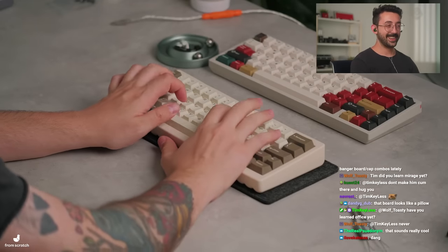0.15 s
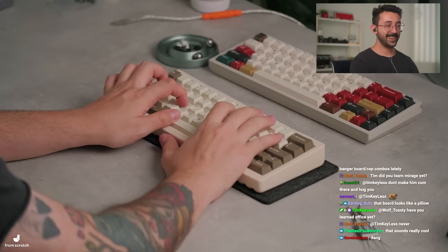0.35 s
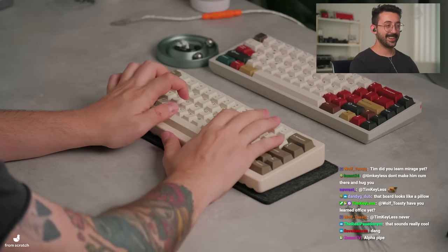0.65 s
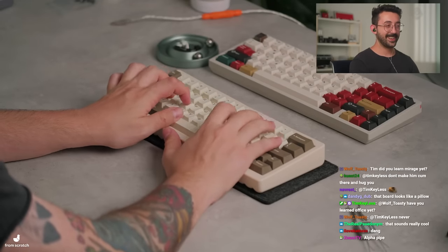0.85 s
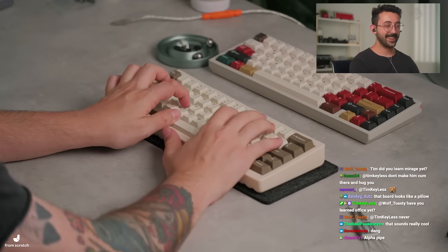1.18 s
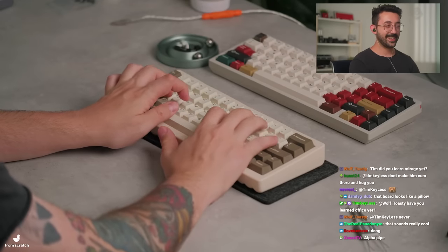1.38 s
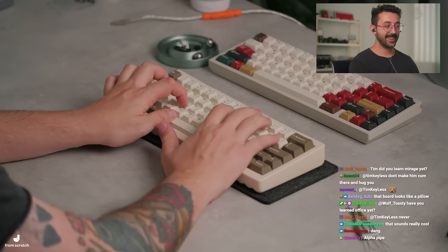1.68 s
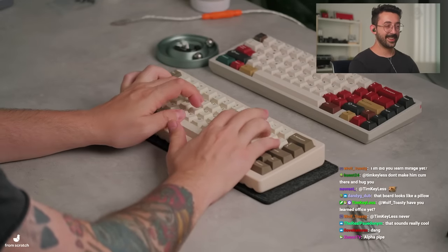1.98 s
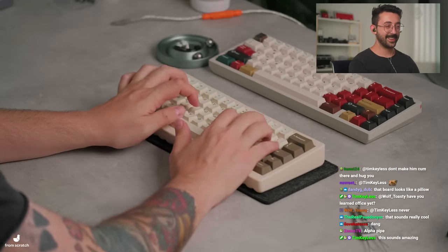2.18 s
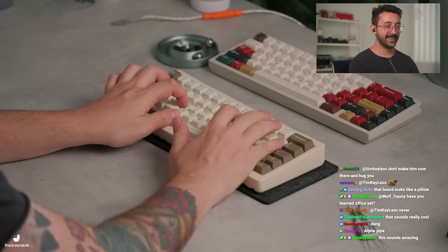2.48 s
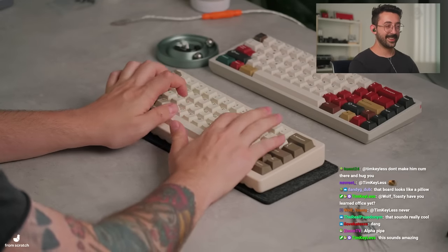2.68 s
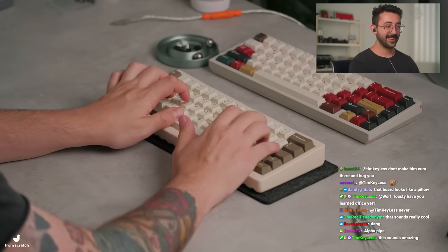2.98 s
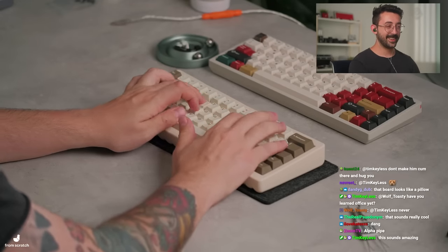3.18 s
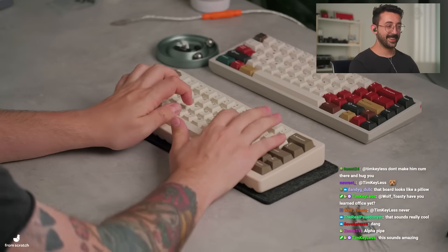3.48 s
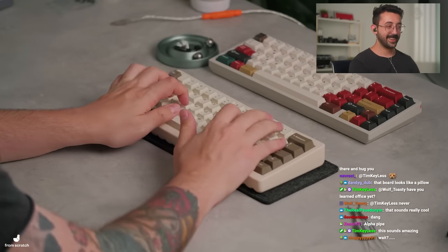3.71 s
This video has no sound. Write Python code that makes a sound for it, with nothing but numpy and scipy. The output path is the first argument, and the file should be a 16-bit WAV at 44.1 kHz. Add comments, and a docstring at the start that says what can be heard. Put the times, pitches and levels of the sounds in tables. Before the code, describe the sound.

Mechanical keyboard typed rapidly without a real pause, dry plastic clicks over faint room rumble and hiss.

```python
"""In a small room, fast typing on a mechanical keyboard that lies on a desk, heard from close by. Each press
and release knocks a plastic keycap, a sum of damped modes that ring for milliseconds, and rattles its switch.
The space bar has lower, hollower modes and its stabiliser rattles; fingertips touch caps with faint ticks.
Knocks also excite low desk modes. Desk reflections, a flutter echo and a short diffuse tail follow each click,
over a quiet rumble and hiss of shaped noise."""
import sys
import numpy as np
from scipy import signal
from scipy.fft import rfft, irfft
from scipy.io import wavfile

SR = 44100
rng = np.random.default_rng(int(sys.argv[2]) if len(sys.argv) > 2 else 0)


def inscribe(sig):
    """Save sig as 16-bit PCM at rate SR to the path in sys.argv[1].

    A 1-D sig is mono; a 2-D sig holds one channel per row.
    Samples are clipped to [-1, 1] before scaling.
    """
    pcm = np.round(np.clip(np.atleast_2d(sig).T, -1, 1) * 32767)
    wavfile.write(sys.argv[1], SR, pcm.astype(np.int16))


N = 169785   # length [samples]


def from_db(db):
    """Logarithmic level: 20 dB is a factor of ten in amplitude."""
    return 10 ** (np.asarray(db) / 20)


def at_hz(hz, points_hz, values):
    """Logarithmic frequency scale: a curve is interpolated evenly per octave."""
    return np.interp(np.log(np.maximum(hz, 1)), np.log(points_hz), values)


def add(track, time_s, sound):
    """Superposition: a sound adds to the track from its start time."""
    start = max(int(round(time_s * SR)), 0)
    track[start:start + len(sound)] += sound[:max(N - start, 0)]


def decay(t, t60):
    """Exponential damping: the amplitude falls by 60 dB in t60 seconds."""
    return np.exp(-np.log(1000) * t / t60)


def high_pass(x, hz):
    """Radiation efficiency: small parts radiate little bass."""
    return signal.sosfilt(signal.butter(2, hz, "high", fs=SR, output="sos"), x)


def coloured_noise(spectrum, size):
    """Spectral shaping: white noise is weighted by frequency and scaled to an rms of 1."""
    white = rfft(rng.standard_normal(size))
    gain = from_db(at_hz(np.fft.rfftfreq(size, 1 / SR), *np.transpose(spectrum)))
    noise = irfft(white * gain, size)
    return noise / noise.std()


def ring(hz, db, t60, size, late=0):
    """Modal superposition: a struck body is a sum of damped sines, each delayed by its own lateness."""
    t = np.maximum(np.arange(size)[:, None] / SR - late, 0)
    modes = from_db(db) * decay(t, t60) * np.sin(2 * np.pi * hz * t)
    signs = (-1.) ** np.arange(len(hz))   # neighbouring modes swing in opposite directions
    return modes @ signs


def contact_noise(spectrum, level_db, t60, size):
    """Random contact: loose plastic gives a burst of shaped noise that dies exponentially."""
    return coloured_noise(spectrum, size) * from_db(level_db) * decay(np.arange(size) / SR, t60)


# spectrum of the room's rumble and hiss: (frequency [Hz], relative density [dB per Hz])
BACKGROUND_SPECTRUM = [(15, -48), (25, -14), (40, -7), (50, -5), (60, 4.5), (75, -9.5), (120, 6.5),
                       (142, -12.5), (165, -0.5), (195, 0), (260, -11), (400, -21), (700, -22),
                       (1500, -27.5), (4000, -27.5), (10000, -39), (16000, -42)]
BACKGROUND_DB = -53.5   # rms level


def background():
    """Stationary noise: one fixed spectrum holds both rumble and hiss."""
    return from_db(BACKGROUND_DB) * coloured_noise(BACKGROUND_SPECTRUM, N)


# early reflections off the desk: (delay [s], level [dB])
DESK_REFLECTIONS = [(.0013, -25.5), (.0025, -28)]
# flutter echo: (delay [s], level [dB])
FLUTTER_ECHOES = [(.0114, -17.5), (.0125, -25), (.0227, -24), (.0339, -28)]
ECHO_CUT_HZ = 10000
# diffuse tail: (frequency [Hz], level [dB], t60 [s])
TAIL_BANDS = [(305, 7, 0.26), (930, -10.5, 0.36), (1620, -8, 0.46), (2620, -12.5, 0.38),
              (4400, -10.5, 0.49), (7000, -13.5, 0.4), (9750, -12.5, 0.33), (15000, -30, 0.3)]
TAIL_DELAY_S, TAIL_BUILD_S = 0.00082, 0.012


def early_reflections(x):
    """Specular reflection: desk and parallel surfaces return delayed, duller copies."""
    out = np.zeros(N)
    dull = signal.sosfilt(signal.butter(1, ECHO_CUT_HZ, fs=SR, output="sos"), x)
    for delay_s, db in list(DESK_REFLECTIONS) + list(FLUTTER_ECHOES):
        add(out, delay_s, from_db(db) * dull)
    return out


def diffuse_tail(x):
    """Reverberation: convolution with noise bands, each dying at its own rate."""
    t = np.arange(SR // 2) / SR
    tail = np.zeros(len(t))
    hz, db, t60 = np.transpose(TAIL_BANDS)
    build = np.clip((t - TAIL_DELAY_S) / TAIL_BUILD_S, 0, 1)
    edges = np.geomspace(200, 17000, 14)
    for low, high in zip(edges, edges[1:]):
        centre = np.sqrt(low * high)
        band_pass = signal.butter(2, [low, high], "band", fs=SR, output="sos")
        band = signal.sosfilt(band_pass, rng.standard_normal(len(t)))
        fade = build * decay(t, at_hz(centre, hz, t60))
        tail += from_db(at_hz(centre, hz, db)) * band * fade / np.linalg.norm(fade)
    return signal.fftconvolve(x, tail)[:N]


# desk top modes: (frequency [Hz], level [dB], t60 [s])
DESK_MODES = [(87, -46.5, 0.076), (117.46, -42, 0.39), (170.6, -61, 0.25), (190.8, -59.5, 0.39),
              (232.5, -48, 0.063), (280.6, -49.5, 0.12), (464, -59, 0.089)]


def desk():
    """Impulse excitation: each key or space bar knock sets off the desk's low modes at its thump level."""
    out = np.zeros(N)
    boom = ring(*np.transpose(DESK_MODES), size=22050)
    for time_s, *_, thump_db in list(KEY_KNOCKS) + list(SPACE_KNOCKS):
        add(out, time_s, from_db(thump_db) * boom)
    return out


# fingers land on a cap without pressing it yet: (time [s], level [dB])
FINGER_TOUCHES = [(.135, -27), (.559, -19), (.696, -19), (1.135, -14), (1.585, -25), (1.981, -28),
                  (2.262, -26), (2.331, -23), (2.767, -17), (3.423, -23)]


def touches():
    """Weak excitation: a fingertip nudges a loose cap, whose modes and rattle give a faint tick."""
    out = np.zeros(N)
    hz, db, t60 = np.transpose(KEYCAP_MODES)
    for time_s, level_db in FINGER_TOUCHES:
        add(out, time_s, ring(hz, db + level_db, t60, size=1024))
        add(out, time_s, contact_noise(SWITCH_RATTLE, level_db + RATTLE_DB, RATTLE_T60_S, size=1024))
    return high_pass(out, CAP_RADIATION_HZ)


MODE_SPREAD_DB = 1.0   # random spread of mode levels: no two knocks are quite alike
# space bar knocks: (time [s], level [dB], brightness [dB per octave], desk thump [dB])
SPACE_KNOCKS = [(0.0441, -3.3, 2, 4), (0.331, -2.7, -0.3, 0.5), (0.7691, -2.5, -0.5, 3),
                (0.9539, 0.5, 2.9, 5), (1.2276, -1, 0.7, 2), (1.6606, -2, 0.5, 1.5), (2.111, -4.1, 1, 3.5),
                (2.4874, -2.7, 1, 2.5), (2.8342, -3.5, 0.3, 1.5), (3.027, -1.2, 2, 4.5),
                (3.323, -3, 1.4, 2), (3.6045, -2.1, -0.2, 1.5)]
# space bar modes: (frequency [Hz], level [dB], t60 [s])
SPACE_BAR_MODES = [(963, -32, 0.023), (1295, -25.5, 0.02), (1762, -22.5, 0.019), (2154, -26.5, 0.015),
                   (2760, -17.5, 0.0054), (3070, -23.5, 0.011), (3500, -26.5, 0.01), (4210, -32, 0.026),
                   (4940, -35, 0.036), (6900, -40, 0.0081), (7700, -31.5, 0.0042), (9900, -41, 0.0062),
                   (12200, -36, 0.0037)]
# spectrum of the space bar's stabiliser rattle: (frequency [Hz], relative density [dB per Hz])
STABILISER_RATTLE = [(300, -30), (700, -26), (1000, -4.5), (1500, 1.5), (2100, 1.5), (3000, -7.5), (4500, -6),
                     (6000, -14), (16000, -38)]
CLATTER_DB, CLATTER_T60_S = -31, 0.044   # level relative to the knock
BAR_RADIATION_HZ = 774   # the bar radiates little below this


def space_bar():
    """Modal scaling: a long bar has lower, longer modes than a cap, and its stabiliser rattles."""
    out = np.zeros(N)
    hz, db, t60 = np.transpose(SPACE_BAR_MODES)
    for time_s, level_db, tilt_db, _ in SPACE_KNOCKS:
        colour_db = tilt_db * np.log2(hz / 2000)
        uneven_db = MODE_SPREAD_DB * rng.standard_normal(len(hz))
        add(out, time_s, ring(hz, db + level_db + colour_db + uneven_db, t60, size=2048))
        add(out, time_s, contact_noise(STABILISER_RATTLE, level_db + CLATTER_DB, CLATTER_T60_S, size=2048))
    return high_pass(out, BAR_RADIATION_HZ)


# keycap knocks, presses and releases: (time [s], level [dB], pitch [ratio], ring length [ratio],
# hollow [dB], clack [dB], tick [dB], tick frequency [Hz], desk thump [dB])
KEY_KNOCKS = [(0.1492, 0.1, 1.012, 0.94, 2.5, 6, -0.5, 8700, -2),
              (0.2051, -5, 1, 1.66, 4.5, 8, 13, 8900, -22), (0.2671, 7, 0.93, 0.87, 4, 2, -6, 10200, 1),
              (0.3586, -7, 0.95, 1.8, 2, -8, -26, 9100, -4.5),
              (0.4083, 2.5, 1.01, 1.03, 2, 6.5, 1, 9050, -8.5),
              (0.458, 5, 0.98, 2.14, -13, -19, -4, 9200, -15),
              (0.5129, -7.5, 1, 1.66, 3.5, 6, 8.5, 9260, -22),
              (0.5712, 6, 0.95, 0.88, -3, 5, 2.5, 8000, -11),
              (0.5864, -5, 0.96, 1.3, -9, -3, -13, 8590, -19),
              (0.6388, -3.3, 0.96, 1.6, -1.5, 2, 11.5, 9370, -14),
              (0.7107, 3.5, 1, 1.3, 4.5, -3, -2, 10070, -14),
              (0.8286, 2.5, 1.054, 1.15, 5.5, 1.5, 3.5, 9600, -16),
              (0.8737, 2.5, 0.97, 2.1, -10, -13, -10, 9400, -5),
              (0.93, -5, 1.014, 1.9, 2, -4, 1, 9750, -24), (0.9835, -5.5, 0.94, 1.2, -6, -6, -14, 9200, -5),
              (1.0324, 3, 0.93, 1.17, -4.5, 4.5, -1, 8800, -14),
              (1.0906, -3.5, 0.93, 1.6, -5, -1, 7.5, 9600, -30),
              (1.1514, 5, 1, 1.1, 5.5, -1.5, -3, 10230, -6.5),
              (1.281, 0.5, 1.046, 1.4, 5, 3, -1, 10100, -29),
              (1.3344, 1.2, 0.97, 1.9, -7.5, -5, -9, 9400, -8),
              (1.4065, -2.5, 1.027, 1.6, 0, 3.5, 4.5, 9820, -20),
              (1.4736, 0.3, 1.03, 1.22, 4, 7, 1, 8900, -11),
              (1.5298, -5, 0.91, 2.1, -3, 2.5, 6.5, 9040, -31),
              (1.599, 8.5, 0.95, 0.83, 0, -15, -4, 10200, -7),
              (1.719, 1, 1.06, 1.33, 3.5, -1.5, -1, 9700, -8),
              (1.7535, 3, 0.97, 2.1, -11, -17, -1, 9300, -7),
              (1.8164, -1, 1.04, 0.92, 2.5, 2, 8.5, 9750, -45),
              (1.8547, -2.5, 0.98, 1.9, -14, -16, -9, 9270, -5),
              (1.863, 4, 0.95, 1.5, -2.5, 3.5, -3, 9270, -8),
              (1.9335, -3.5, 0.93, 1.5, -6.5, -1, 6.5, 9260, -16),
              (1.9947, 3, 0.96, 1.2, 4.5, 0.5, 0.5, 10500, -3.5),
              (2.0827, -13.5, 1, 1.4, 8, -14, -7, 9400, -31),
              (2.1504, -8, 1.01, 0.72, 6, 2, -1, 10600, -29),
              (2.2913, -8, 0.95, 1.36, 0, -2, -18, 9500, -29),
              (2.3544, -4.5, 0.97, 2.2, -5, -6, -20, 9500, -30),
              (2.3667, 0, 1.06, 2.2, -13, -11, -9, 10400, -11),
              (2.4067, 8.5, 0.92, 1.22, -6.5, 2.5, -6, 10400, -5.5),
              (2.508, -11, 0.82, 1, 3, -1, -10, 9270, -22),
              (2.5344, 1.5, 1.045, 1.35, 3.5, 7, -2.5, 9650, -4),
              (2.5921, 4, 0.95, 1.8, -6.5, -10, -4.5, 9260, -31),
              (2.644, -6.5, 1.16, 1.04, 10, 11, 13.5, 8200, -27),
              (2.6547, 1, 0.97, 1.6, 0, 7.5, 0.5, 8960, -3),
              (2.696, -6.5, 0.87, 1.2, -16, -2, -8, 9440, -10),
              (2.7129, -2.5, 0.93, 1.55, 1.5, 4.5, 10, 9200, -13),
              (2.7801, 5, 0.99, 1.07, 6, -3, -0.5, 10170, -6),
              (2.859, -11.5, 0.95, 1.5, 8, -1, -18, 8700, -25),
              (2.911, 2.9, 1.04, 1.23, 4.5, -1, -1, 9530, -9),
              (2.9398, 5, 0.98, 2.2, -9, -14, -4, 9410, -4),
              (2.9928, -4.8, 1.01, 1.55, -1, 3, 10.5, 9300, -33),
              (3.039, 0.5, 0.99, 1.1, 4, -6, 4, 9500, -6), (3.044, -9.5, 0.95, 3.4, 0, 10.5, -5, 9530, -37),
              (3.1045, 1, 0.94, 1.66, -2.5, -1, 1.5, 9600, -39),
              (3.1546, -5, 0.97, 3.6, -15, -9, -25, 9770, -17),
              (3.1692, 11.5, 0.9, 1.04, -15.5, -6, -13, 10000, 1),
              (3.2368, 1.2, 0.84, 0.89, -10, 6, -5.5, 10200, -14),
              (3.2728, -16, 0.97, 2, 2, -12, -18, 9550, -32),
              (3.3065, -13, 0.96, 0.8, 8, -3, -6, 8720, -36),
              (3.4391, 3, 0.95, 1.3, -3.5, 6, -2.5, 8750, -2.5),
              (3.4963, -1.8, 0.91, 1.56, -4, 0.5, 8.5, 9250, -26),
              (3.5528, 3.5, 1, 1.22, 7, 2.5, 2.5, 10140, -20),
              (3.6333, -3.6, 0.94, 0.7, 11, 0, 1, 10330, -26),
              (3.6676, 2.5, 1.007, 1.2, 3.5, 8, -1, 9590, -6),
              (3.7298, 3, 0.95, 2.06, -9, -5, -5.5, 8900, -5),
              (3.7764, -5.8, 1.03, 2.2, 2, 4, 1, 9500, -27),
              (3.8078, 4.7, 0.93, 0.77, -8.5, 4.5, -2, 9000, -8),
              (3.8276, -8, 0.98, 2.3, 0, 0, -25, 9300, -7)]
# keycap and case modes: (frequency [Hz], level [dB], t60 [s])
KEYCAP_MODES = [(890, -51.5, .011), (1283, -47.5, 0.012), (1657, -38.5, 0.013), (2452, -19.5, 0.0055),
                (3062, -19, 0.0058), (4136, -38.5, 0.0091), (4820, -34, 0.0042), (6380, -37.5, 0.0016),
                (6950, -37, 0.0032), (9040, -33.5, 0.0037), (9880, -33, 0.0039), (11800, -71, 0.00089),
                (14360, -43, 0.0033)]
# spectrum of the switch rattle: (frequency [Hz], relative density [dB per Hz])
SWITCH_RATTLE = [(200, -14), (600, -7), (1500, -2.5), (2800, 6.5), (5000, 5.5), (7000, 1), (9800, -4),
                 (11500, -8), (16000, -7)]
RATTLE_DB, RATTLE_T60_S = -38, 0.016   # level relative to the knock
HOLLOW_HZ, CAP_HZ, CLACK_HZ, TICK_HZ = 1690, 2795, 4700, 10200   # centres of a keycap's colours
TICK_MODES_ABOVE_HZ, USUAL_TICK_HZ = 8000, 9430   # the highest modes follow each key's own tick
TREBLE_DETUNE, TREBLE_SPREAD_DB = 0.036, 2.0   # random spreads above the clack: frequency ratio, level
ROCK_S = 0.000405   # the cap rocks as it lands: treble modes start up to this late
CAP_RADIATION_HZ = 920   # a small cap radiates little below this


def keycaps():
    """Modal excitation: all knocks share one set of cap modes, tuned and weighted by the key, plus switch rattle."""
    out = np.zeros(N)
    hz, db, t60 = np.transpose(KEYCAP_MODES)
    treble = hz > CLACK_HZ
    spread_db = np.where(treble, TREBLE_SPREAD_DB, MODE_SPREAD_DB)
    for time_s, level_db, pitch, length, hollow_db, clack_db, tick_db, tick_hz, _ in KEY_KNOCKS:
        colour_db = at_hz(hz, [HOLLOW_HZ, CAP_HZ, CLACK_HZ, TICK_HZ], [hollow_db, 0, clack_db, tick_db])
        uneven, detune = rng.standard_normal((2, len(hz)))
        tuning = np.where(hz > TICK_MODES_ABOVE_HZ, tick_hz / USUAL_TICK_HZ, pitch)
        tuned_hz = hz * tuning * (1 + TREBLE_DETUNE * detune * treble)
        strength_db = db + level_db + colour_db + uneven * spread_db
        late_s = ROCK_S * rng.random(len(hz)) * treble
        add(out, time_s, ring(tuned_hz, strength_db, t60 * length, size=1024, late=late_s))
        add(out, time_s, contact_noise(SWITCH_RATTLE, level_db + RATTLE_DB, RATTLE_T60_S, size=1024))
    return high_pass(out, CAP_RADIATION_HZ)


def scene():
    """Linear superposition: background and desk add to the clicks and the room's response to them."""
    clicks = touches() + space_bar() + keycaps()
    reverberation = early_reflections(clicks) + diffuse_tail(clicks)
    return (background() + desk() + reverberation + clicks)[None]


def record(dry):
    """Band limiting: a steep elliptic low-pass removes the top above 16.2 kHz."""
    return signal.sosfilt(signal.ellip(10, .1, 80, 16200, fs=SR, output="sos"), dry)


dry = scene()
out = record(dry)
inscribe(out)
```